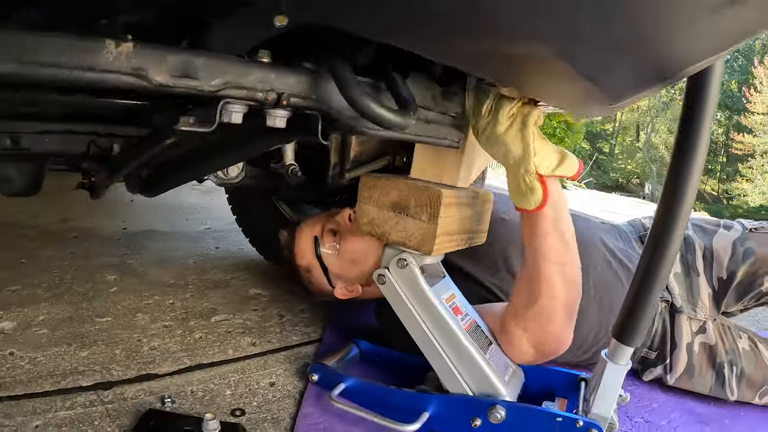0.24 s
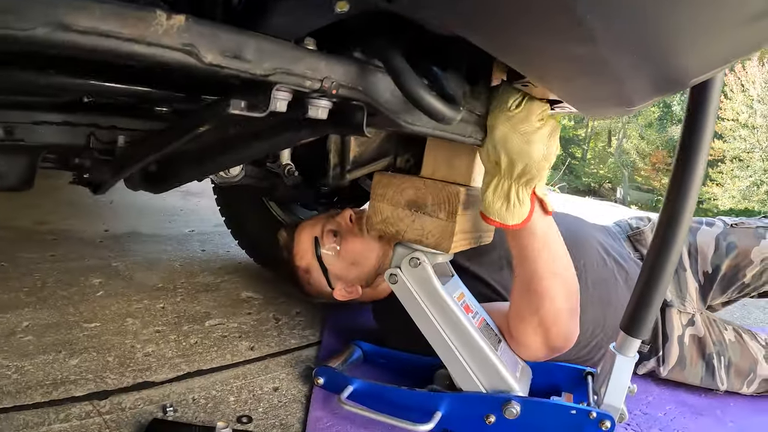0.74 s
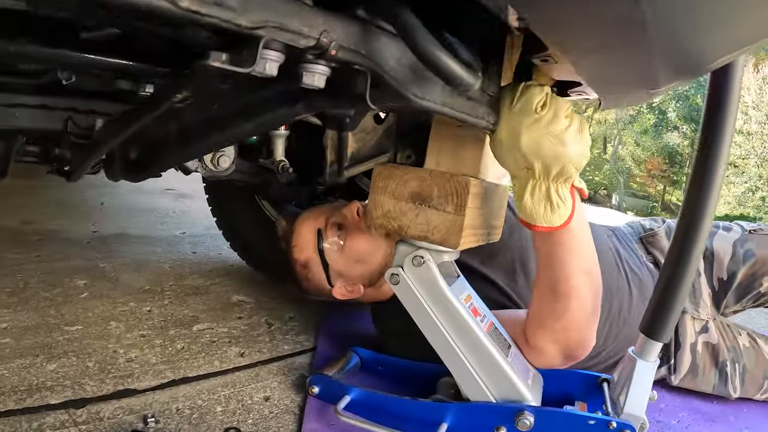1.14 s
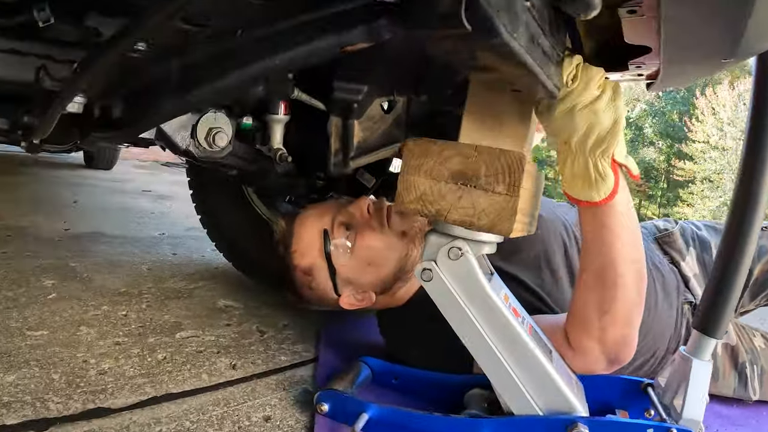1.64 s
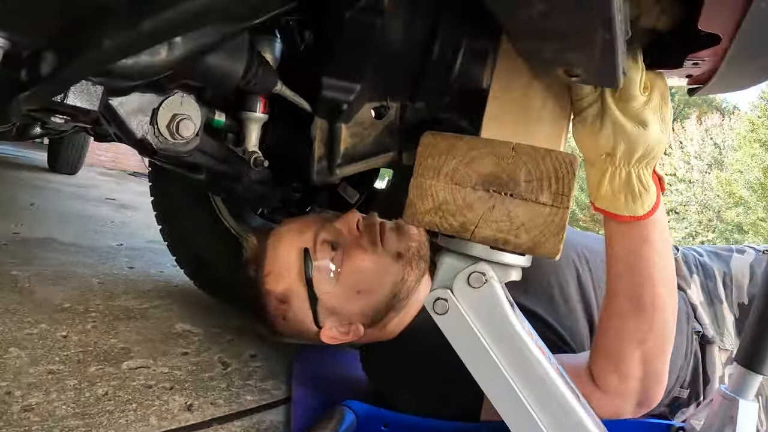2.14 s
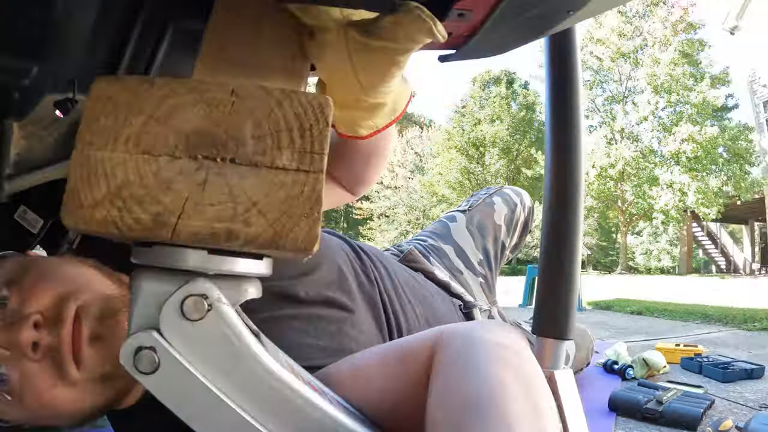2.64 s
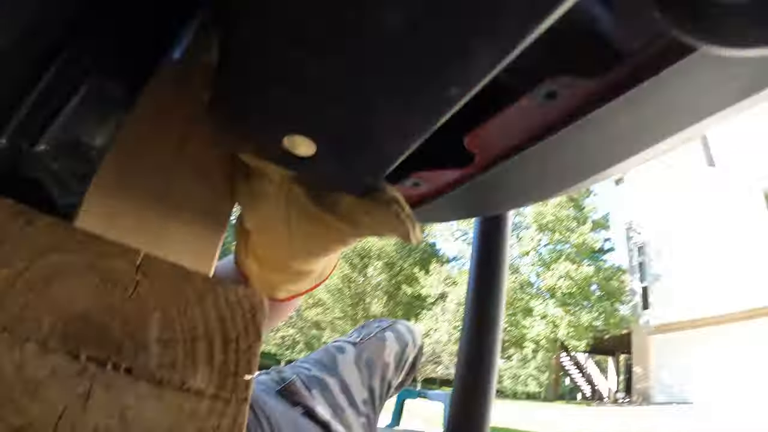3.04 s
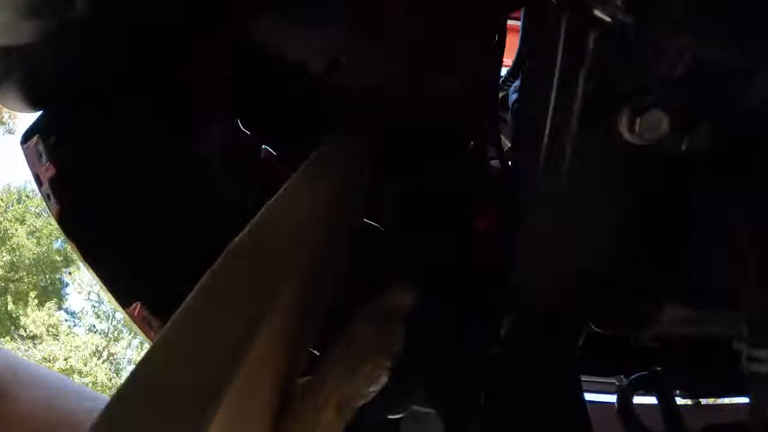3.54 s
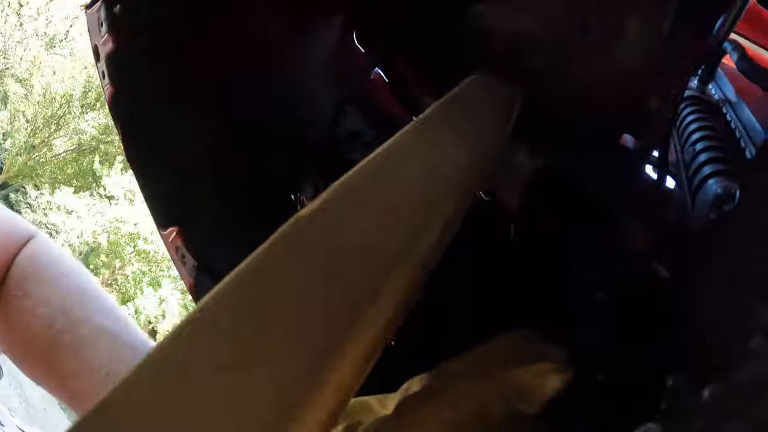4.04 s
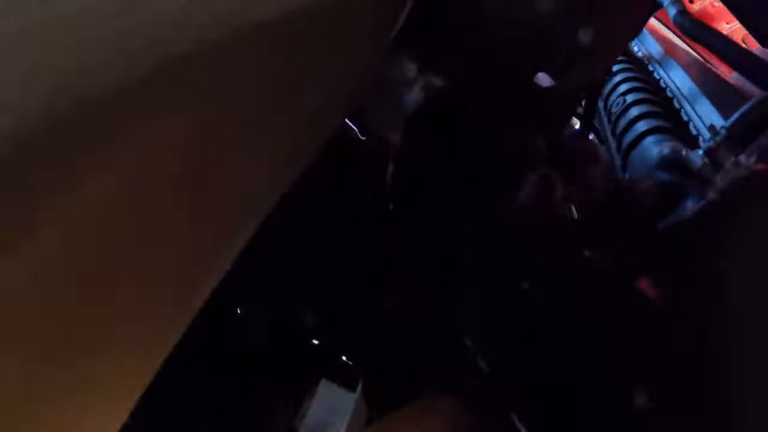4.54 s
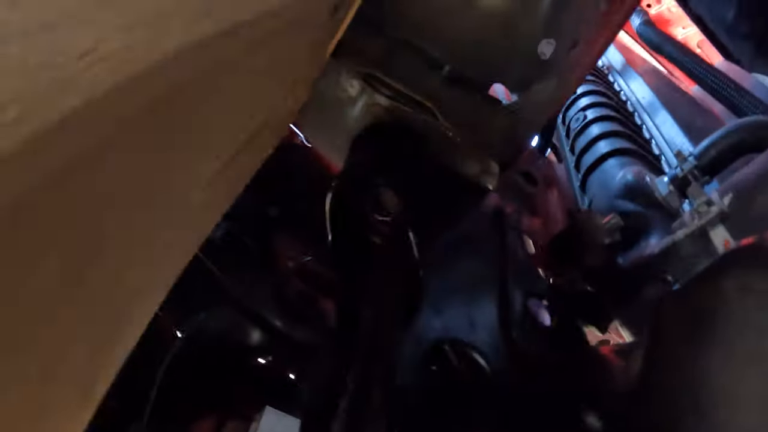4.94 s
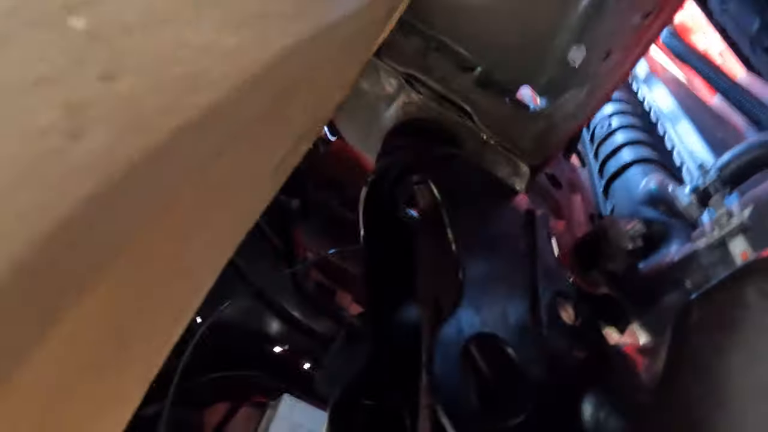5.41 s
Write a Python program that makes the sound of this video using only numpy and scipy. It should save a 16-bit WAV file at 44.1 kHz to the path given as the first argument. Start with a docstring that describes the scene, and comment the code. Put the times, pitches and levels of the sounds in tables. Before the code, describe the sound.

A close stereo camera microphone hears a dry metallic crack, then irregular ringing clanks with chattering steel, over soft outdoor air and a low hum. After the hum suddenly ends, handling takes over: case knocks, rumbling shoves, glove rubbing and gritty ticks. Later come a few load snaps, a short raspy scrape and paired clinks, with faint short echoes between slab and truck floor.

```python
"""A sharp snap, then loose steel clanks and chatters, as wood blocks on a floor jack are set against a truck's frame.
A low hum, as of a motor, ends abruptly at 2.21 s; a gloved hand moves a camera in under the truck: its case
bumps and rumbles, the glove rustles, something scrapes along the metal and clinks twice.
Struck steel is a bank of dying modes plus dense noise; bumps are short low sines with noise ticks;
the scrape is noise through resonances; hum, air and glove are unsteady sines and shaped noise."""
import sys
import numpy as np
from scipy import signal
from scipy.fft import rfft, irfft, next_fast_len
from scipy.io import wavfile
from scipy.ndimage import map_coordinates

SR = 44100
rng = np.random.default_rng(int(sys.argv[2]) if len(sys.argv) > 2 else 0)


def wav_record(signal):
    """Record a signal, one row per channel, as 16-bit PCM in the file named by sys.argv[1]."""
    frames = np.transpose(np.atleast_2d(signal))
    bounded = np.clip(frames, -1, 1)
    # unit amplitude maps onto the largest positive 16-bit level
    quanta = np.round(bounded * 32767).astype(np.int16)
    wavfile.write(sys.argv[1], SR, quanta)


N = 250047
T = np.arange(SR // 2) / SR  # seconds, the life of one blow

# Outdoor air. Each row: time in seconds, murmur level in dB.
MURMUR_LEVEL = [(0, -38), (1.1, -39.5), (2.18, -39), (2.28, -46.5), (5.67, -56)]
# Spectra of the low murmur and the thin hiss. Each row: frequency in Hz, relative density in dB.
MURMUR_SPECTRUM = [(24, -42), (40, -21), (97, 2), (194, -17), (327, -19), (381, -27.5), (436, -26.5),
                   (720, -35), (907, -29.5), (4000, -43.5), (5200, -77), (8800, -120)]
HISS_SPECTRUM = [(300, 9), (900, -2.5), (1400, 3.5), (2200, -7.5), (4000, -12.5), (5200, -5.5), (6000, -3),
                 (7400, -6.5), (8600, -21), (10500, -30.5), (12300, -23.5), (13500, -48)]
# Lines of the low hum. Each row: mean frequency in Hz, mean level in dB.
HUM_LINES = [(84, -40.5), (107.7, -39.5), (166.5, -49.5), (215, -57), (251, -59.5)]
# Echoes between slab and truck floor. Each row: frequency in Hz, relative level in dB.
ECHO_SPECTRUM = [(200, -0.5), (1500, 6.5), (8000, -9)]

# Restlessness of the hand. Each row: time in seconds, case rumble in dB before RUMBLE_GAIN_DB.
GRIP_LEVEL = [(0, -35.5), (2.2, -41), (2.7, -42), (3.0, -28), (3.7, -27), (4.6, -30.5), (5.67, -34)]
# Shoves that shift the camera. Each row: peak time in seconds, rumble in dB before RUMBLE_GAIN_DB.
SHOVES = [(1.02, -31), (1.54, -30), (1.73, -28.5), (2.98, -24), (3.33, -22.5), (3.412, -22), (3.65, -18.5),
          (4.26, -25.5), (4.72, -17.5), (5.45, -26.5)]
# Glove strokes. Each row: peak time in seconds, half length in seconds, relative rustle in dB, relative rub in dB.
STROKES = [(.01, 0.015, -43, -49), (0.552, 0.079, -55, -38), (1.08, 0.063, -45.5, -36.5),
           (1.18, 0.066, -47.5, -47.5), (2.826, 0.0065, -44.5, -30), (2.98, 0.033, -56, -37),
           (3.076, 0.023, -45.5, -35.5), (3.23, .05, -45, -38), (3.597, 0.079, -46.5, -45),
           (4.016, 0.017, -62, -32), (4.158, 0.01, -45.5, -34), (4.366, 0.077, -39.5, -38.5),
           (4.734, 0.036, -36.5, -30.5), (4.831, 0.025, -44, -30), (5.265, 0.013, -47, -39),
           (5.329, 0.017, -49.5, -39), (5.423, 0.045, -45, -41), (5.552, 0.024, -52, -45)]
# Spectra of case rumble, glove rub and glove rustle. Each row: frequency in Hz, relative level in dB.
RUMBLE_SPECTRUM = [(8.8, -18), (15, 10), (35, 3.5), (113, -14), (140, -14.5), (180, -36), (310, -120)]
RUB_SPECTRUM = [(70, -17), (150, 2.5), (300, -3.5), (600, -14), (1200, -26), (2500, -54)]
RUSTLE_SPECTRUM = [(300, 2.5), (900, 1), (1450, 10), (2000, 2.5), (3200, 0), (5500, -7), (7500, -14.5),
                   (9500, -23), (12300, -23), (14500, -49)]

# Bumps on the case. Each row: start in seconds, thump peak in dB before panning, pitch in Hz,
# thump t60 in seconds, left-right difference in dB, tick level in dB.
BUMPS = [(1.519, -28, 150, 0.057, -7.5, -44), (2.422, -46, 170, .03, 0, -40),
         (2.54, -37.5, 170, 0.081, 11, -60), (2.764, -28.5, 168, .06, -9, -50),
         (2.828, -10, 127, 0.028, -10.5, -22), (2.987, -25, 171, 0.022, -19, -28),
         (3.058, -24, 157, 0.069, 6, -39), (3.09, -26, 121, 0.057, 14.5, -43),
         (3.205, -49, 170, 0.025, 0, -32), (3.225, -15, 173, 0.025, 8, -25.5),
         (3.243, -21, 200, 0.0089, -16, -24), (3.266, -16.5, 143, 0.018, 3, -26),
         (3.573, -32, 150, 0.059, 0, -29), (3.634, -26, 126, 0.071, -9, -47),
         (4.011, -18, 160.5, 0.08, -18, -25), (4.136, -18, 58, 0.29, 7, -55),
         (4.454, -32.5, 203, 0.029, -10, -28), (4.843, -11, 166.4, 0.05, -16.5, -26),
         (5.449, -27, 192, 0.066, -18.5, -26.5)]
# Grit clicks on the case. Each row: start in seconds, relative level in dB.
GRIT_CLICKS = [(.729, -35), (3.012, -37), (3.257, -19), (3.374, -38), (4.081, -31), (4.592, -32),
               (4.659, -33), (4.846, -34)]
# Spectrum of a tick on the case. Each row: frequency in Hz, relative level in dB.
TICK_SPECTRUM = [(250, 14.5), (700, 5.5), (1400, 7.5), (2200, -5), (4000, -7.5), (7000, -9), (12000, -35),
                 (15500, -51)]

# Scrape strokes. Each row: peak time in seconds, level in dB.
SCRAPES = [(4.627, -39.5), (4.738, -21)]
# Frame resonances. Each row: centre in Hz, width in Hz, relative level in dB.
FRAME_MODES = [(1093, 125, -5), (1380, 56, 1), (1463, 83, 2), (1703, 60, 1.5), (2020, 91, -6.5),
               (2280, 110, -8), (2880, 160, -7.5), (3420, 175, -7.5), (4160, 140, -9.5), (5620, 920, -16.5)]
# Modes of the two clinks. Each row: start in seconds, frequency in Hz, level in dB, t60 in seconds.
CLINK_MODES = [(4.81, 1078, -20, 0.057), (4.813, 1580, -21.5, 0.08), (4.811, 2020, -15, 0.022),
               (4.811, 890, -24, 0.048), (4.813, 3219, -27.5, 0.026), (4.811, 9000, -44.5, 0.027),
               (4.859, 1417, -24.5, 0.13), (4.86, 1520, -43, 0.083), (4.859, 3190, -36.5, 0.04)]

# Snaps of the settling load. Each row: start in seconds, level in dB, treble change in dB,
# t60 in seconds before DAMPING_SHARE, left-right difference in dB.
SNAPS = [(.466, -17.5, 3, 0.094, 1.5), (0.585, -44.5, -20, 0.23, 3), (.902, -42, -4, 0.057, 3),
         (1.062, -34, -27, 0.057, -1), (3.406, -34.5, -21, 0.085, 0.5), (4.191, -33, -12, 0.073, 0.5),
         (4.351, -22, -10.5, 0.078, -2), (4.390, -25.5, -15, 0.032, 2), (4.43, -30, -29, 0.054, 4.5),
         (5.150, -28, -9, 0.08, 3.5)]
# Spectrum of a snap. Each row: frequency in Hz, relative level in dB.
SNAP_SPECTRUM = [(200, -21), (490, -7), (650, -12.5), (1000, -4.5), (1350, 0.5), (1750, -3), (2300, -3.5),
                 (3000, -7), (4200, -11), (5300, -8.5), (7500, -12), (8600, -27), (12000, -26),
                 (15500, -51)]
# Damping of close modes. Each row: frequency in Hz, factor on the t60.
DAMPING_SHARE = [(400, 2.06), (2000, 1.18), (6000, 0.94), (14000, 0.97)]

# Steel clanks. Each row: start in seconds, relative level in dB, then changes in dB of the low modes,
# lower ping, upper ping and treble, then rise constant in seconds.
CLANKS = [(1.228, -8, -8, -11, 5, -2, 0.0016), (1.316, -16, -7.5, -12, -0.5, -12, 0.0031),
          (1.57, -32, 12, 0, -6, 3.5, 0.0021), (1.598, -11.5, -5, 2.5, -11, -5.5, 0.0025),
          (1.638, -30, 1, 9, -8, 10.5, .001), (1.666, -15, 2.5, 1, -8, 1.5, 0.006),
          (1.695, -21, 9.5, -1.5, -6, 3.5, 0.0013), (1.785, -35, 0, -11, -5, -1, 0.004),
          (1.914, -23, 1.5, -0.5, -12, -3, 0.00092), (1.995, -23, 2.5, 3.5, 4.5, -9, 0.0024)]
# Clear modes of the steel. Each row: frequency in Hz, relative level in dB, t60 in seconds.
STEEL_MODES = [(509, -30, 0.68), (608.3, -12.5, 0.25), (694, -6, 0.19), (757, -11, 0.27), (880, -38, 0.21),
               (973, -5.5, 0.12), (1090, 4, 0.18), (1190, -16, 0.1), (1240, -14.5, 0.2), (1462, -10, 0.22),
               (1550, 0, 0.17), (1604, 0.5, 0.095), (1723, 0, 0.083), (2001, -8, 0.3), (2250, -19.5, 0.27),
               (2560, -41, .13), (2620, -20.5, 0.3), (3230, -10.5, 0.13), (3120, -14, 0.1),
               (3744, -12, 0.096), (3480, -12.5, 0.17), (4060, -14, 0.14), (4260, -6.5, 0.08),
               (5880, -15.5, 0.092), (7757, -23, .08)]
# Its dense, short-lived modes. Each row: frequency in Hz, relative level in dB.
CLATTER_SPECTRUM = [(300, -7.5), (700, 3), (1600, 1), (2400, -6.5), (4200, -5), (5500, -11), (7800, -14),
                    (9000, -22.5), (12000, -27.5), (15500, -45)]

HUM_END_S, HUM_FADE_DB_PER_S = 2.21, 251
RUMBLE_GAIN_DB = 1
RUB_UNDER_DB, RUSTLE_UNDER_DB = -22.5, -26.5  # constant fidgeting, relative to the grip level
SHOVE_HALF_S, SHOVE_RUB_DB = 0.056, -28  # rub relative to the shove level
CATCHES_PER_S, CATCH_DB, CATCH_SCATTER_DB = 45, 22.5, 3  # relative to the rustle, before the tick spectrum
THUMP_RISE_S, TICK_T60_S = 0.0014, 0.019  # t60 before DAMPING_SHARE
CLICK_T60_S, CLICK_BODY_DB, CLICK_TOP_DB = 0.03, -7, 3.5  # t60 before DAMPING_SHARE
SCRAPE_RISE_S, SCRAPE_FALL_S = 0.034, 0.02
SLIPS_PER_S, SLIP_SCATTER_DB = 570, 3  # knots of the scrape's random level
LOWER_PING_HZ, UPPER_PING_HZ, PING_WIDTH_HZ = 1090, 2030, 56
CHATTER_PER_S, CHATTER_DB = 450, 2.5  # knots and depth of the clank's random level
CONTACT_S = 0.0003  # build-up of a noise burst
SHADE_DB, SHADE_HZ = 7, 8000  # the right port hears less of the top
TOP_HZ = 15850


def amp(db):
    """Decibels to gain."""
    return 10 ** (np.asarray(db) / 20)


def unit(x):
    """Scale to rms 1."""
    return x / np.sqrt(np.mean(x ** 2) + 1e-20)


def along(points, hz):
    """Interpolate (Hz, value) points on a log frequency axis."""
    f, v = np.transpose(points)
    return np.interp(np.log(hz + 1), np.log(f), v)


def curves(rows):
    """One value per sample for each column after the time."""
    s, *cols = np.transpose(rows)
    return [np.interp(np.arange(N) / SR, s, c) for c in cols]


def wobble(knots_per_s):
    """Smooth random curve through normally distributed knots."""
    knots = rng.standard_normal(int(N * knots_per_s / SR) + 4)
    return map_coordinates(knots, [np.arange(N) * knots_per_s / SR])


def swell(peak_s, rise_s, fall_s):
    """Bell-shaped movement peaking at 1."""
    t = np.arange(N) / SR - peak_s
    return np.exp(-(t / np.where(t < 0, rise_s, fall_s)) ** 2)


def above(hz, corner_hz):
    """Soft step from 0 to 1 around the corner."""
    return 1 - 1 / (1 + (hz / corner_hz) ** 4)


def filtered(x, gain):
    """Apply a response given as a function of Hz."""
    n = x.shape[-1]
    m = next_fast_len(n + 8192)
    return irfft(rfft(x, m) * gain(np.fft.rfftfreq(m, 1 / SR)), m)[..., :n]


def pan(db):
    """Left and right gains for a level difference."""
    return amp([[db / 2], [-db / 2]])


def white(size, width):
    """Stereo noise; width is the strength of the part the sides carry in opposite sign."""
    mid, side = rng.standard_normal((2, size))
    return np.array([mid + width * side, mid - width * side])


def noise(spectrum, width, size=N):
    """Coloured stereo noise of rms 1."""
    return unit(filtered(white(size, width), lambda hz: amp(along(spectrum, hz))))


def burst(spectrum, t60_s, colour_db, width):
    """Close modes struck at once: noise dying at a rate set per frequency."""
    x = filtered(noise(spectrum, width, size=len(T)), lambda hz: amp(colour_db(hz)))
    hz, t, z = signal.stft(x, SR, nperseg=128)
    band_t60_s = t60_s * along(DAMPING_SHARE, hz)[:, None]
    dying = signal.istft(z * amp(-60 * t / band_t60_s), nperseg=128)[1][:, :len(T)]
    return dying * (1 - np.exp(-(T / CONTACT_S) ** 2))


def ring(hz, t60_s, spread_rad):
    """One dying mode, at slightly different phases in the two ports."""
    phase = rng.uniform(0, 2 * np.pi) + spread_rad * rng.standard_normal((2, 1))
    return np.sin(2 * np.pi * hz * T + phase) * amp(-60 * T / t60_s)


def add(track, start_s, sound):
    """Mix a sound into the track."""
    part = track[:, round(start_s * SR):][:, :sound.shape[-1]]
    part += sound[..., :part.shape[1]]


def air():
    """Outdoor murmur of changing level over a thin steady hiss, both shaped noise."""
    murmur = amp(curves(MURMUR_LEVEL)[0]) * noise(MURMUR_SPECTRUM, width=0.13)
    hiss = amp(-53.0) * noise(HISS_SPECTRUM, width=0.6)
    return murmur + hiss


def hum():
    """Low hum, as of a motor: sine lines slightly unsteady in pitch and level, ending abruptly."""
    lines = np.zeros(N)
    for hz, db in HUM_LINES:
        level = amp(db + 1.43 * wobble(5.98))
        pitch_hz = hz + 0.76 * wobble(8.65)
        lines += level * np.sin(2 * np.pi * np.cumsum(pitch_hz) / SR)
    since_end_s = np.maximum(np.arange(N) / SR - HUM_END_S, 0)
    return np.sqrt(2) * lines * amp(-HUM_FADE_DB_PER_S * since_end_s) * pan(db=1.0)


def underbody(x):
    """Brief diffuse echoes between slab and truck floor: convolution with a dying noise burst."""
    tail = burst(ECHO_SPECTRUM, 0.21, np.zeros_like, width=0.32)
    tail *= 1 - np.exp(-T / 0.003)
    return signal.fftconvolve(x, tail / np.linalg.norm(tail[0]), axes=1)[:, :N]


def catches():
    """Glove seams catch on the case: sparse random ticks of uneven size."""
    chance, size = rng.random(N), rng.standard_normal(N)
    pulses = (chance < CATCHES_PER_S / SR) * amp(CATCH_DB + CATCH_SCATTER_DB * np.clip(size, -2, 2))
    return filtered(pulses, lambda hz: amp(along(TICK_SPECTRUM, hz)))


def handling():
    """Case rumbles with grip and shoves; the glove rubs, rustles and catches on it, with swells at the strokes."""
    grip = amp(curves(GRIP_LEVEL)[0])
    shoves = sum(amp(db) * swell(s, SHOVE_HALF_S, SHOVE_HALF_S) for s, db in SHOVES)
    rub_level = amp(RUB_UNDER_DB) * grip + amp(SHOVE_RUB_DB) * shoves
    rustle_level = amp(RUSTLE_UNDER_DB) * grip
    for s, half_s, rustle_db, rub_db in STROKES:
        slide = swell(s, half_s, half_s)
        rub_level = np.hypot(rub_level, amp(rub_db) * slide)
        rustle_level = np.hypot(rustle_level, amp(rustle_db) * slide)
    rumble_level = amp(RUMBLE_GAIN_DB) * np.hypot(grip, shoves)
    rumble = rumble_level * noise(RUMBLE_SPECTRUM, width=0.31) * pan(db=2)
    rub = rub_level * amp(-1 + 3.9 * wobble(120)) * noise(RUB_SPECTRUM, width=0.47)
    flutter = amp(-1.5 + 2.5 * wobble(45) + 2.5 * wobble(600))
    rustle = flutter * noise(RUSTLE_SPECTRUM, width=0.53)
    return rumble + rub + rustle_level * (rustle + catches()) * pan(db=4.0)


def bumps():
    """Each bump on the case gives a noise tick and a few low cycles."""
    out = np.zeros((2, N))
    for s, db, hz, t60_s, pan_db, tick_db in BUMPS:
        thump = np.sin(2 * np.pi * hz * T) * amp(-60 * T / t60_s)
        thump *= 1 - np.exp(-T / THUMP_RISE_S)
        add(out, s, amp(db) * thump / np.abs(thump).max() * pan(pan_db))
        add(out, s, amp(tick_db) * burst(TICK_SPECTRUM, TICK_T60_S, np.zeros_like, width=0.8))
    return out


def grit_clicks():
    """Grit on the case: bright noise bursts without a thump."""
    def bright_db(hz):
        return CLICK_BODY_DB * (1 - above(hz, 1050)) + CLICK_TOP_DB * above(hz, 8500)

    out = np.zeros((2, N))
    for s, db in GRIT_CLICKS:
        click = burst(TICK_SPECTRUM, CLICK_T60_S, bright_db, width=0.61)
        add(out, s, amp(db) * click * pan(db=5))
    return out


def frame_response(hz):
    """Sum of frame resonances with alternating signs, rolled off at the top."""
    modes = 0
    for k, (centre, width, db) in enumerate(FRAME_MODES):
        damping = 1j * hz * width
        modes = modes + (-1) ** k * amp(db) * damping / (centre * centre - hz * hz + damping)
    return modes * (1 - above(hz, corner_hz=13000))


def scrape():
    """Quick irregular slips, as noise of random level, drive the resonances of the metal frame."""
    pressure = sum(amp(db) * swell(s, SCRAPE_RISE_S, SCRAPE_FALL_S) for s, db in SCRAPES)
    slips = white(N, width=0.39) * amp(SLIP_SCATTER_DB * wobble(SLIPS_PER_S))
    # level set by the response to slips at constant pressure
    return filtered(pressure * slips, frame_response) / np.std(filtered(slips, frame_response))


def clinks():
    """Two light metal contacts on different parts, each a few clear dying modes."""
    out = np.zeros((2, N))
    for s, hz, db, t60_s in CLINK_MODES:
        mode = ring(hz, t60_s, spread_rad=0.23) * (1 - np.exp(-T / 0.00016))
        add(out, s, amp(db) * mode)
    return out * pan(db=1.5)


def snaps():
    """Parts under load slip with a short hard crack, a dying noise burst."""
    out = np.zeros((2, N))
    for s, db, treble_db, t60_s, pan_db in SNAPS:
        crack = burst(SNAP_SPECTRUM, t60_s, lambda hz: treble_db * above(hz, 5600), width=0.4)
        add(out, s, amp(db) * crack * pan(pan_db))
    return out


def near(hz, centre_hz):
    """Bell of ping width around a mode."""
    return np.exp(-((hz - centre_hz) / PING_WIDTH_HZ) ** 2)


def clanks():
    """Loose steel is struck: hit point sets low modes and pings, hardness the treble; dense modes chatter."""
    out = np.zeros((2, N))
    for s, db, low_db, lower_db, upper_db, treble_db, rise_s in CLANKS:
        def colour_db(hz):
            return low_db * (1 - above(hz, 1260)) + treble_db * above(hz, 3630)

        modes = np.zeros((2, len(T)))
        for hz, mode_db, t60_s in STEEL_MODES:
            pings_db = lower_db * near(hz, LOWER_PING_HZ) + upper_db * near(hz, UPPER_PING_HZ)
            strike_db = mode_db + colour_db(hz) + pings_db + rng.normal(0, 1)
            modes += amp(strike_db) * ring(hz, t60_s, spread_rad=0.52)
        chatter = amp(CHATTER_DB * wobble(CHATTER_PER_S)[:len(T)])
        clatter = chatter * burst(CLATTER_SPECTRUM, 0.12, colour_db, width=0.44)
        blow = amp(-8) * modes + amp(-8.0) * clatter
        add(out, s, amp(db) * blow * (1 - np.exp(-T / rise_s)))
    return out * pan(db=2.0)


def scene():
    """Metal with its underbody echoes, the hand on the camera, and the background."""
    metal = clanks() + snaps() + scrape() + clinks()
    hand = bumps() + grit_clicks() + handling()
    return metal + amp(-21.0) * underbody(metal) + hand + hum() + air()


def record(dry):
    """Two ports, the right one shaded in the top; nothing passes at or above the band limit."""
    return filtered(dry, lambda hz: pan(SHADE_DB) ** above(hz, SHADE_HZ) * (hz < TOP_HZ))


dry = scene()
out = record(dry)
wav_record(out)
```